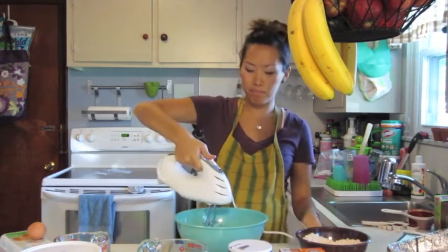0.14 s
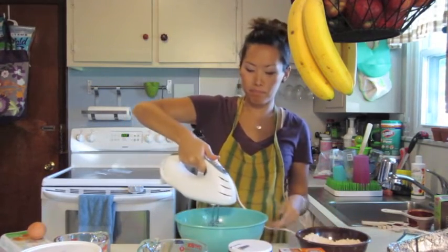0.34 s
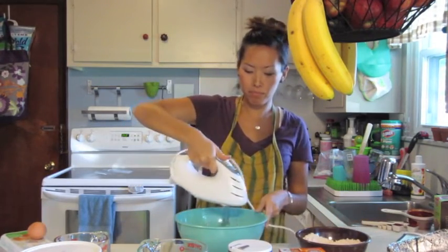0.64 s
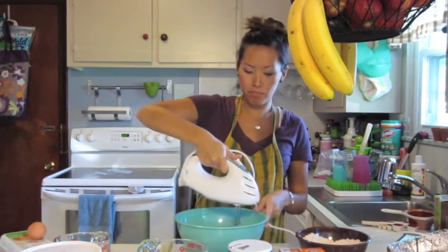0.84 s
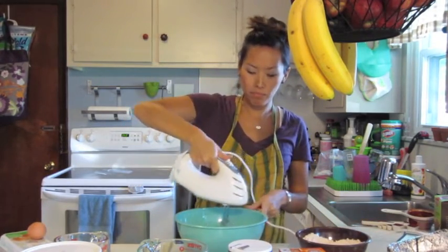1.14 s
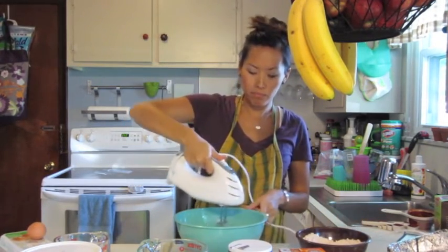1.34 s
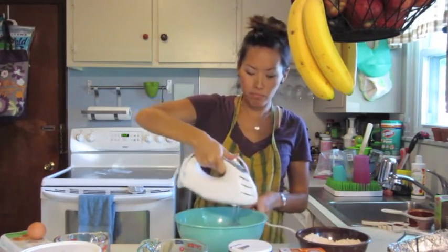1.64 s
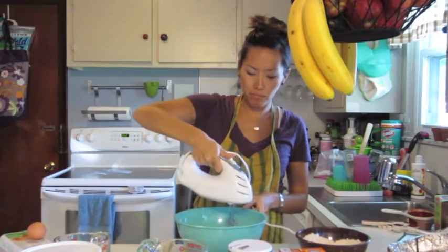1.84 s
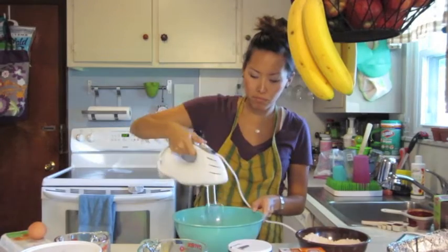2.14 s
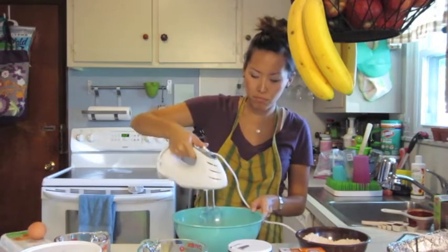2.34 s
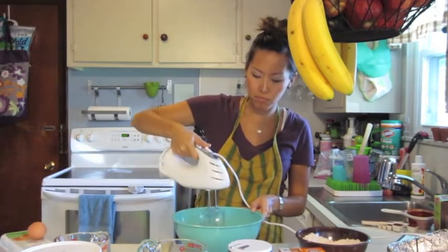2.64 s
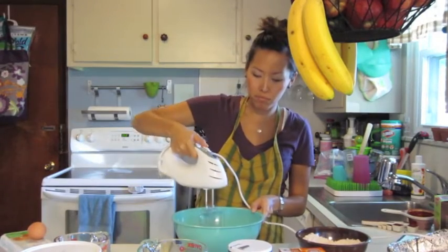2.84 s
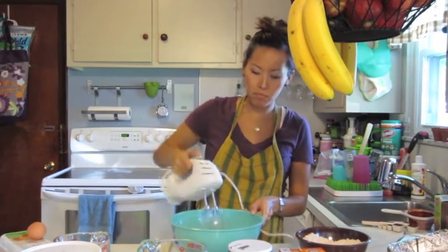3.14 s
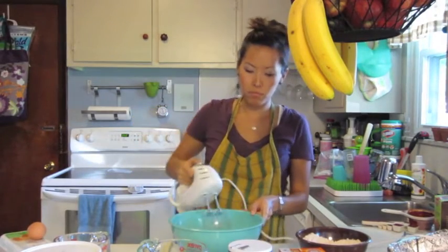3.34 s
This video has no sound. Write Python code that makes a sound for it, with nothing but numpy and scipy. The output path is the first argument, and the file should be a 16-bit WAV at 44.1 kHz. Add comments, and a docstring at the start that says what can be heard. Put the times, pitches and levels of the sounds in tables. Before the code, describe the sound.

A handheld electric mixer whines up in a bowl, drops out, then bursts briefly and winds down.

```python
"""Hand mixer in a plastic bowl

A hand mixer spins up in a bowl in a small kitchen: whine with mains sidebands, brush and fan hiss, gear chatter,
beaters scraping and knocking on the bowl. After a short dip to silence it coasts, beaters lifted and rattling;
one more burst of power, then it runs down. One speed curve drives the tones, blade pulses and noise levels;
filters colour the sources, and a short room tail follows the mixer.
"""
import sys
import numpy as np
from scipy import signal
from scipy.fft import rfft, irfft
from scipy.io import wavfile
from scipy.ndimage import uniform_filter1d

SR = 44100
rng = np.random.default_rng(int(sys.argv[2]) if len(sys.argv) > 2 else 0)


def digitize_waveform(pressure):
    """Quantize a signal to 16-bit integers and store it at the path in sys.argv[1].

    Rows of a 2-D input are taken as channels; values are limited to [-1, 1].
    """
    field = np.atleast_2d(pressure).T
    bounded = np.clip(field, -1, 1)
    quanta = np.round(bounded * 32767).astype(np.int16)
    wavfile.write(sys.argv[1], SR, quanta)


N = 154350

DIP_S = 2.068
FULL_SPEED_HZ = 2370  # whine pitch at speed 1
RIPPLE_HZ = 120  # twice the mains rate
WHINE_CYCLES_PER_BLADE, WHINE_CYCLES_PER_TURN = 65.5, 20


def amp(db):
    """Decibels to gain."""
    return 10 ** (np.asarray(db) / 20)


def unit(x):
    """Scale to rms 1."""
    return x / np.sqrt(np.mean(x ** 2))


def curve(rows):
    """Straight lines through (time_s, value) rows."""
    return np.interp(np.arange(N) / SR, *np.array(rows, float).T)


def through(x, response):
    """Play a signal through an impulse response."""
    return signal.fftconvolve(x, response)[:N]


def body(points, size=4096):
    """Minimum-phase response of unit energy with the given colour, by folding the cepstrum."""
    hz, db = np.array(points, float).T
    bin_hz = np.arange(size // 2 + 1) * SR / size
    bin_db = np.interp(np.log(bin_hz + 1), np.log(hz), db)
    cepstrum = irfft(np.log(amp(bin_db)))
    cepstrum[1:size // 2] *= 2
    cepstrum[size // 2 + 1:] = 0
    response = irfft(np.exp(rfft(cepstrum)))
    return response / np.linalg.norm(response)


def wander(rate_hz):
    """Smooth random drift of rms 1: noise under a Gaussian low-pass."""
    f_hz = np.arange(N // 2 + 1) * SR / N
    spectrum = rfft(rng.standard_normal(N))
    return unit(irfft(spectrum * np.exp(-.5 * (f_hz / rate_hz) ** 2), N))


def clicks(rate_per_s, spread_db):
    """Random clicks of either sign and uneven size, rms 1."""
    present = rng.random(N) < rate_per_s / SR
    sign = rng.choice([-1, 1], N)
    return unit(present * sign * amp(spread_db * rng.standard_normal(N)))


def decay(t60_s):
    """Half a second of exponential decay."""
    return np.exp(-np.log(1000) * np.arange(SR // 2) / SR / t60_s)


def blows(rows, t60_s):
    """A decaying noise burst for each (start_s, level_db) row."""
    hits = np.zeros(N)
    for start_s, level_db in rows:
        hits[int(start_s * SR)] += amp(level_db)
    return through(hits, decay(t60_s)) * rng.standard_normal(N)


def ripple_phase():
    """Phase of the torque ripple at twice the mains rate, in radians."""
    return 2 * np.pi * RIPPLE_HZ * np.arange(N) / SR


def coil_hum(power):
    """The coils hum at twice the ripple rate, with a drifting level."""
    powered_db, idle_db = -43.5, -48.5
    hum = np.sqrt(2) * np.sin(2 * ripple_phase()) * amp(2 * wander(1.3))
    # power may exceed 1: the idle term then turns negative
    return hum * (amp(powered_db) * power + amp(idle_db) * (1 - power))


def kitchen_floor():
    """Steady coloured noise of the kitchen."""
    # noise colour: freq_hz, level_db
    floor_colour = [(25, -21), (60, -24), (110, -13), (170, 3.5), (300, 0), (600, -2), (1200, -5.5),
                    (2000, -13), (2500, -23), (3100, -17.5), (9000, -26.5), (12000, -50), (15500, -52)]
    return amp(-45) * through(rng.standard_normal(N), body(floor_colour))


def brushes(speed, phase):
    """Fan air and brush crackle, pulsing with each turn of the shaft."""
    # hiss colour: freq_hz, level_db
    hiss_colour = [(300, -15.5), (1000, 4.5), (1500, 1), (2100, 3), (2550, -0.5), (3100, -3), (3700, -9.5),
                   (4900, -12.5), (5900, -9), (6700, -13.5), (7800, -14.5), (10500, -26.5), (11700, -46),
                   (13200, -34), (15500, -44)]
    hiss_db, speed_power, pulse_depth, crackle_db = -29.5, 1.84, .12, -3
    grit = rng.standard_normal(N) + amp(crackle_db) * clicks(900, spread_db=1.5)
    pulse = 1 + pulse_depth * np.cos(phase / WHINE_CYCLES_PER_TURN)
    return amp(hiss_db) * through(grit * pulse * speed ** speed_power, body(hiss_colour))


def gears(speed, phase):
    """Gear teeth chatter in the housing, swelling with each blade."""
    # housing colour: freq_hz, level_db
    gear_colour = [(100, -13), (165, -2), (230, -12), (310, -2), (450, 3.5), (660, 8), (850, 0), (1130, 3),
                   (1400, -4.5), (2100, -2.5), (2500, -18.5), (3100, -18), (5000, -59.5)]
    gear_db, speed_power, swell_depth = -29.5, .88, .1
    swell = 1 + swell_depth * np.cos(phase / WHINE_CYCLES_PER_BLADE)
    teeth = clicks(2500, spread_db=5) * swell
    return amp(gear_db) * through(teeth * speed ** speed_power, body(gear_colour))


def bowl(phase, in_bowl):
    """Each blade slaps and scrapes the wall of the bowl; some knock hard."""
    # beater pressure on the bowl: time_s, level_db
    contact = [(.1, -25.5), (.25, -4), (.45, -13.5), (.76, -7), (.86, 0), (1.0, 1.5), (1.12, 1),
               (1.3, -5.5), (1.46, -10), (1.57, 3), (1.72, -1.5), (1.8, -1.5), (1.94, 4.5), (2.06, -6.5)]
    # hardest knocks: start_s, level_db
    knock_rows = [(.826, -12), (.847, -4.5), (.877, 0.5), (.943, 2), (.971, 7), (1.039, -25), (1.071, -15),
                  (1.518, 1), (1.54, 5.5), (1.565, 1.5), (1.582, 5.5), (1.608, -9), (1.638, 1.5),
                  (1.663, 1), (1.676, 2.5), (1.702, 0.5), (1.728, 1), (1.757, -20), (1.875, 2),
                  (1.902, -14)]
    # bowl resonance: freq_hz, level_db
    bowl_colour = [(90, -24), (170, -9), (270, -5), (380, -13), (490, -5.5), (590, 3), (680, 1), (820, -6),
                   (1100, -12), (1500, -29), (2500, -20), (3080, -17.5), (3700, -26), (6000, -32),
                   (10000, -44), (12000, -61)]
    scrape_db, knock_db, knock_t60_s = -24.5, -12, .031
    slap_decay_blades, slap_floor = .28, .15
    blade_cycles = phase / WHINE_CYCLES_PER_BLADE / (2 * np.pi)
    slap = unit(np.exp(-(blade_cycles % 1) / slap_decay_blades) + slap_floor)
    slap = slap * amp(.74 * wander(27))
    pressure = amp(scrape_db) * amp(curve(contact)) * in_bowl
    scrape = pressure * slap * clicks(4000, spread_db=2.5)
    knocks = amp(knock_db) * blows(knock_rows, knock_t60_s)
    return through(scrape + knocks, body(bowl_colour))


def counter(phase, in_bowl):
    """Drifting harmonics of the blade rate and noise thrum through bowl and counter."""
    # thrum passed to the counter: time_s, level_db
    thrum_level = [(.1, -11), (.26, -13), (.58, 0), (.8, -3), (.97, 0), (1.2, -3.5), (1.5, -1.5), (1.65, 6),
                   (1.79, 8.5), (1.86, -6), (2.06, 1)]
    # boom of the bowl on the counter: freq_hz, level_db
    boom_colour = [(15, -48), (33, 6), (42, -25), (52, -2), (68, 8), (76, 4.5), (92, 4.5), (120, -30),
                   (165, -5.5), (260, 0), (600, -36)]
    thrum_db = -36
    blade_rad = phase / WHINE_CYCLES_PER_BLADE
    partials = np.zeros(N)
    for k in range(1, 8):
        partials += amp(2 * wander(15)) * np.sin(k * blade_rad + .74 * wander(5))
    boom = through(partials + 8 * rng.standard_normal(N), body(boom_colour, size=16384))
    return amp(thrum_db) * amp(curve(thrum_level)) * unit(boom) * in_bowl


def sharp_ticks():
    """The switch and the beater wires tick: short coloured bursts."""
    # ticks: start_s, level_db
    tick_rows = [(.1096, -7.5), (.9068, -13), (.9687, -5.5), (1.58, -5), (2.3625, -4.5), (3.2166, -10)]
    # tick colour: freq_hz, level_db
    tick_colour = [(400, -26), (1500, 4.5), (3100, 3), (4800, -6), (7300, 2), (10300, -10.5), (11700, -33),
                   (13500, -21), (15500, -37)]
    return amp(-24) * through(blows(tick_rows, t60_s=.056), body(tick_colour))


def motor_whine(hz, phase, power):
    """Whine and overtone throb at twice the mains rate; the whine blurs away from full speed."""
    # whine as the hand turns the mixer: time_s, level_db
    whine_level = [(.11, -8), (.16, 0), (.21, 8.5), (.27, 4), (.32, 2.5), (.42, -1), (.5, -11), (.85, -5),
                   (1.05, -2.5), (1.35, 1), (1.6, -3), (2.05, 2), (2.37, 3), (2.5, -5), (2.57, -4.5),
                   (2.76, 3), (2.81, -0.5)]
    # passage through the housing: freq_hz, level_db
    whine_colour = [(200, -5), (480, -12.5), (650, 0.5), (850, -4), (1130, 2), (1350, -2), (1550, 8.5),
                    (1780, 6), (2020, -3.5), (2350, 2.5), (2600, -9.5), (2850, -1), (3500, -15),
                    (5000, -27)]
    whine_db, overtone_db, speed_power = -29.5, -4.5, .05
    ripple_depth, second_ripple_depth, wobble_rad = .6, .3, 1.0
    blur_hz, overtone_from_hz = 84, 2300
    speed = hz / FULL_SPEED_HZ
    ripple = ripple_phase()
    wobbly = phase + wobble_rad * np.cos(ripple)  # torque wobble
    blur = np.clip(np.sqrt(np.abs(1 - speed)), 0, 1)
    clear_tone = np.sqrt(2 - 2 * blur ** 2) * np.sin(wobbly)
    blurred_tone = wander(blur_hz) * np.sin(wobbly) + wander(blur_hz) * np.cos(wobbly)
    overtone = amp(overtone_db) * (1 + 1.9 * wander(blur_hz)) * np.sin(2 * phase)
    high_pass = signal.butter(4, overtone_from_hz, "high", fs=SR, output="sos")
    overtone = signal.sosfilt(high_pass, overtone)
    throb = 1 + ripple_depth * np.cos(ripple) + second_ripple_depth * np.cos(2 * ripple)
    drive = power * amp(curve(whine_level)) * speed ** speed_power * throb
    tones = clear_tone + blur * blurred_tone + overtone
    return amp(whine_db) * unit(through(drive * tones, body(whine_colour)))


def start_sparks():
    """Brushes spark while the motor gets under way: decaying coloured noise."""
    # sparks: start_s, level_db
    spark_rows = [(.21, 1.5), (.27, -8), (2.364, -10)]
    # spark colour: freq_hz, level_db
    spark_colour = [(2000, -8), (5000, -5), (7200, -0.5), (8500, -5.5), (10500, -21), (11700, -34),
                    (15500, -42)]
    return amp(-42) * through(blows(spark_rows, t60_s=.66), body(spark_colour))


def loose_beaters(speed, lifted):
    """The lifted beaters rattle in their sockets; random taps ring beaters and housing."""
    # freedom to rattle: time_s, level_db
    rattle_level = [(2.1, -3), (2.18, 0.5), (2.3, -2), (2.5, -2.5), (2.8, 0), (3.05, 0), (3.25, 3),
                    (3.5, -7)]
    # rattle colour: freq_hz, level_db
    rattle_colour = [(120, -38), (220, 5.5), (380, -10), (560, 3), (750, 3), (1080, -1), (1400, -3),
                     (1750, -3), (2200, -25), (2550, -17), (3500, -14.5), (8000, -43), (10500, -37),
                     (12000, -59)]
    # ringing of beaters and housing: freq_hz, t60_s, level_db
    modes = [(592, .2, -5), (677, .25, -1), (995, .25, 0), (1750, .08, -10), (2200, .05, -18)]
    rattle_db, ring_db, speed_power, taps_per_s = -38, 5, .87, 840
    taps = clicks(taps_per_s, spread_db=2) * speed ** speed_power
    taps = taps * amp(curve(rattle_level)) * lifted
    t = np.arange(SR // 2) / SR
    ring = np.zeros(SR // 2)
    for mode_hz, t60_s, level_db in modes:
        ring += amp(level_db) * decay(t60_s) * np.sin(2 * np.pi * mode_hz * t) / np.sqrt(t60_s)
    ringing = amp(ring_db) * through(taps, ring / np.linalg.norm(ring))
    return amp(rattle_db) * (through(taps, body(rattle_colour)) + ringing)


def kitchen_room(x):
    """Direct sound plus a short noise tail whose treble decays a little sooner."""
    low_t60_s, treble_t60_s, split_hz, gap_s = .47, .42, 3000, .004
    tail_gain = amp(-3)
    noise = rng.standard_normal(SR // 2)
    low = signal.sosfilt(signal.butter(2, split_hz, fs=SR, output="sos"), noise)
    high = signal.sosfilt(signal.butter(2, split_hz, "high", fs=SR, output="sos"), noise)
    # opposite signs keep the two bands from cancelling at the split
    tail = low * decay(low_t60_s) - high * decay(treble_t60_s)
    tail[:int(gap_s * SR)] = 0
    tail = tail / np.linalg.norm(tail)
    return (x + tail_gain * through(x, tail)) / np.hypot(1, tail_gain)


def scene():
    """Motor speed and the power switch drive the layers; no room tail outlasts the dip."""
    # motor speed as whine pitch, in the bowl and lifted: time_s, pitch_hz
    speed_in_bowl = [(0, 200), (.11, 230), (.18, 600), (.24, 700), (.32, 1010), (.43, 1220), (.5, 1470),
                     (.7, 1750), (.85, 1910), (1.0, 1990), (1.2, 2165), (1.32, 2250), (1.44, 2305),
                     (1.52, 2350), (1.64, 2318), (1.74, 2352), (1.9, 2376), (2.06, 2371)]
    speed_lifted = [(2.075, 901), (2.16, 825), (2.27, 477), (2.355, 350), (2.375, 868), (2.42, 1080),
                    (2.48, 1273), (2.55, 1674), (2.65, 1905), (2.73, 2244), (2.81, 2382), (3.0, 1550),
                    (3.2, 1134), (3.36, 574), (3.5, 380)]
    # power switched on: start_s, end_s, level_db
    power_rows = [(.11, 2.06, 5.5), (2.36, 2.81, 2.5)]
    t = np.arange(N) / SR
    hz = curve(list(speed_in_bowl) + list(speed_lifted)) * (1 + .000554 * wander(11.8))
    speed = hz / FULL_SPEED_HZ
    phase = 2 * np.pi * np.cumsum(hz) / SR
    power = np.zeros(N)
    for on_s, off_s, level_db in power_rows:
        power += amp(level_db) * ((t > on_s) & (t < off_s))
    power = uniform_filter1d(power, size=400)  # soft switching edges
    lifted = 1. * (t > DIP_S)
    in_bowl = 1 - lifted

    mixer = brushes(speed, phase) + gears(speed, phase) + bowl(phase, in_bowl)
    mixer += sharp_ticks() + motor_whine(hz, phase, power) + start_sparks()
    mixer += loose_beaters(speed, lifted)
    heard = kitchen_room(mixer * in_bowl) * in_bowl + kitchen_room(mixer * lifted)
    return (heard + coil_hum(power) + counter(phase, in_bowl) + kitchen_floor())[None]


def record(dry):
    """The level dips briefly to silence; a steep low-pass cuts the top."""
    fade_out_s, fade_in_s, top_hz = .08, .09, 15750
    from_dip_s = np.arange(N) / SR - DIP_S
    dip = np.clip(np.maximum(-from_dip_s / fade_out_s, from_dip_s / fade_in_s), 0, 1)
    low_pass = signal.ellip(10, .2, 70, top_hz, fs=SR, output="sos")
    return signal.sosfilt(low_pass, dry * dip)


dry = scene()
out = record(dry)
digitize_waveform(out)
```